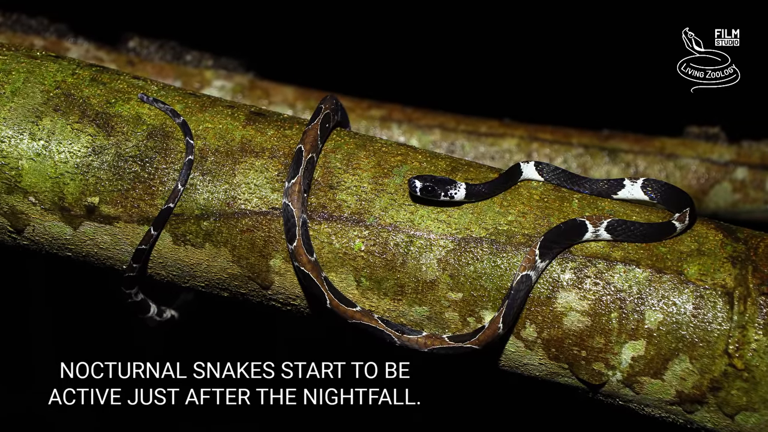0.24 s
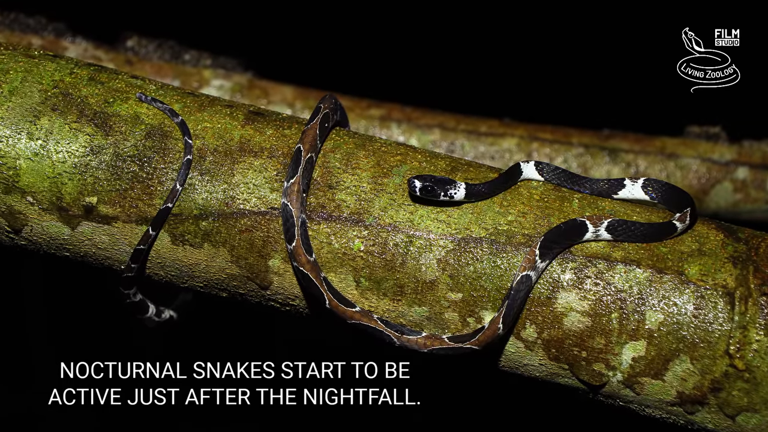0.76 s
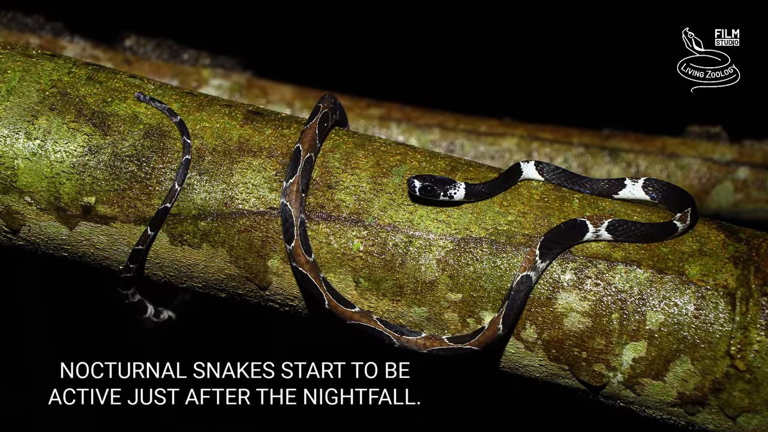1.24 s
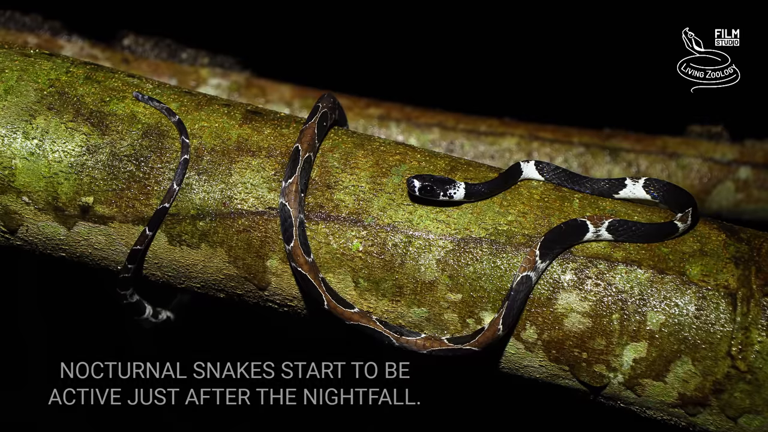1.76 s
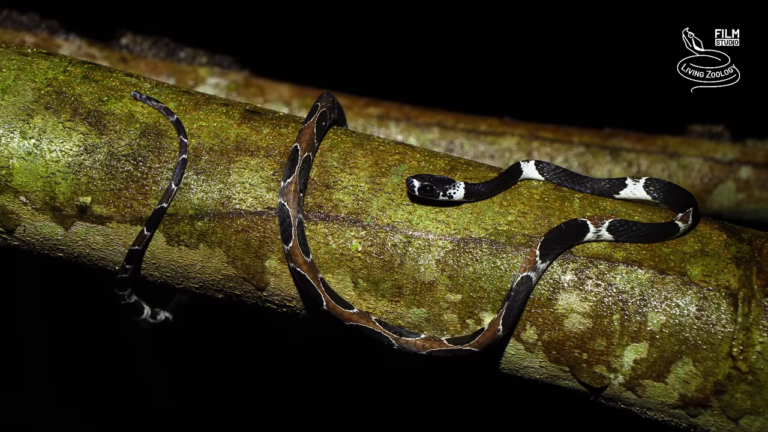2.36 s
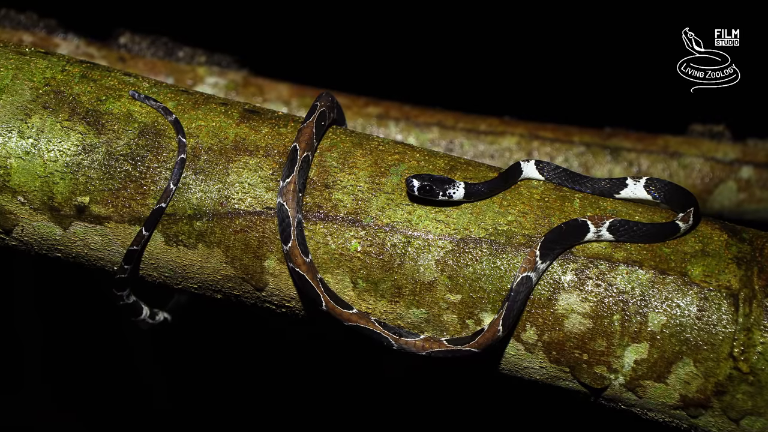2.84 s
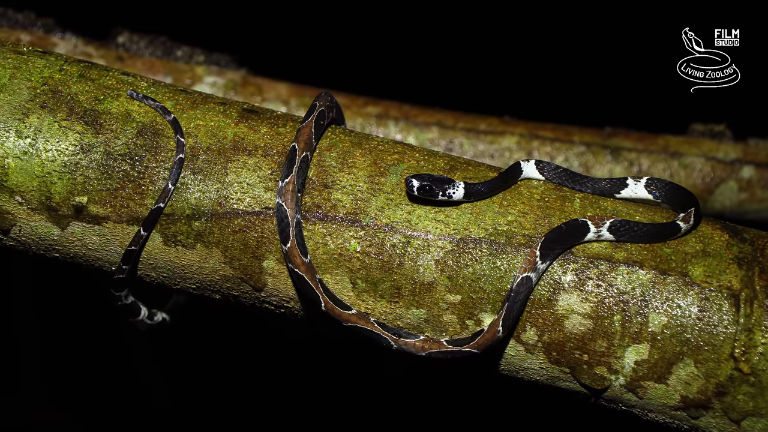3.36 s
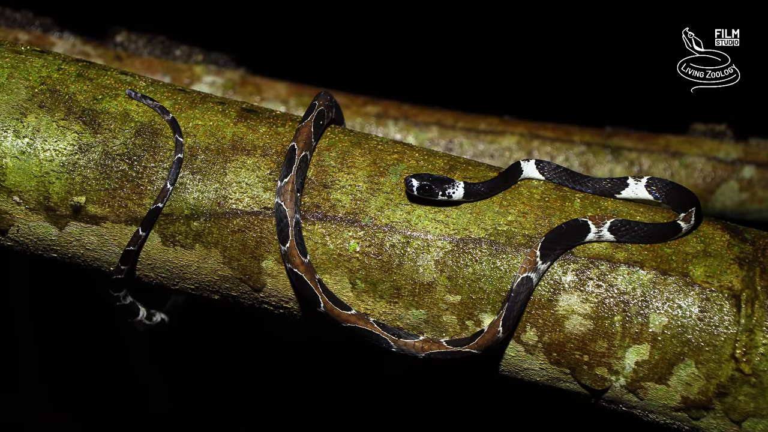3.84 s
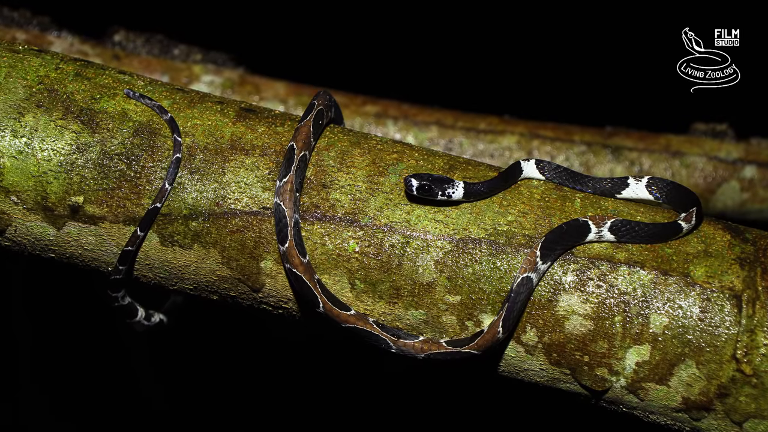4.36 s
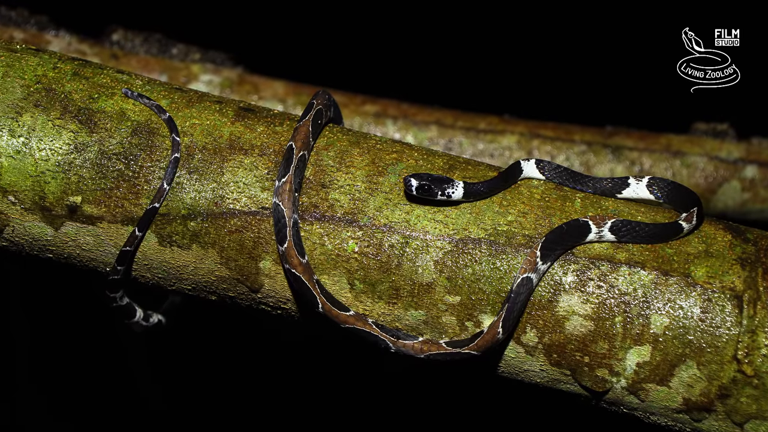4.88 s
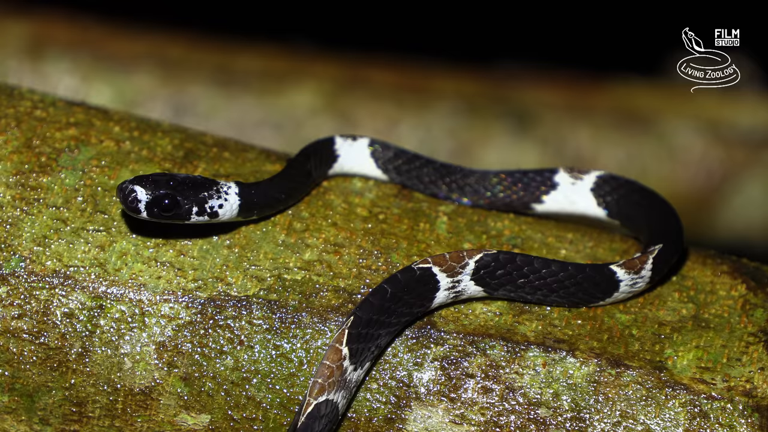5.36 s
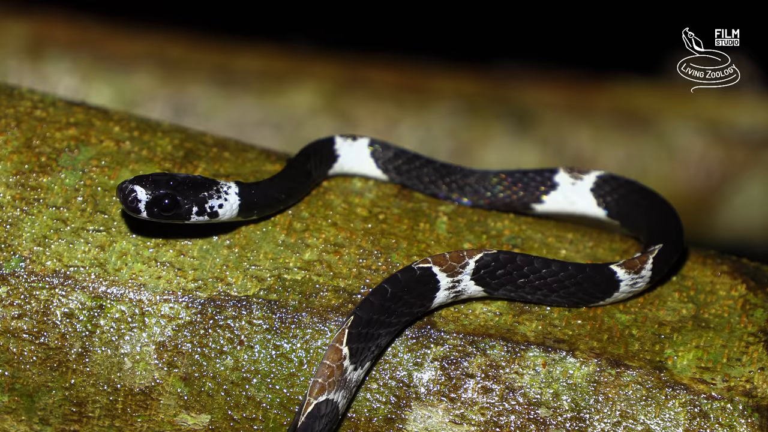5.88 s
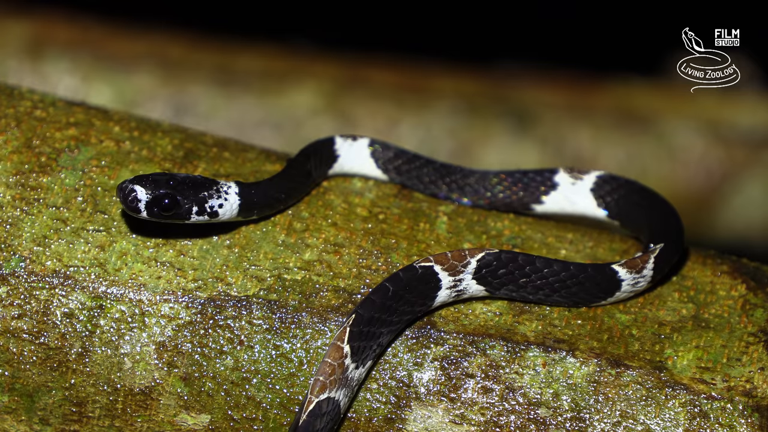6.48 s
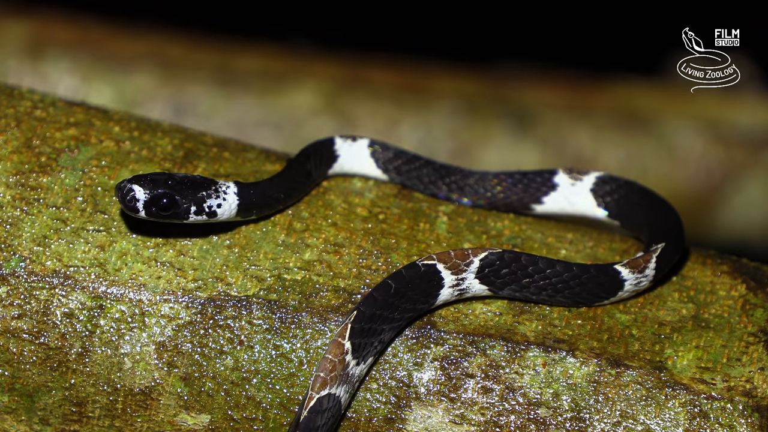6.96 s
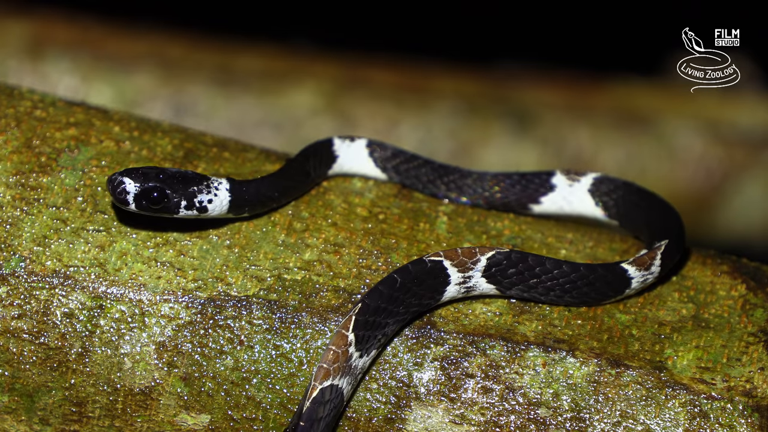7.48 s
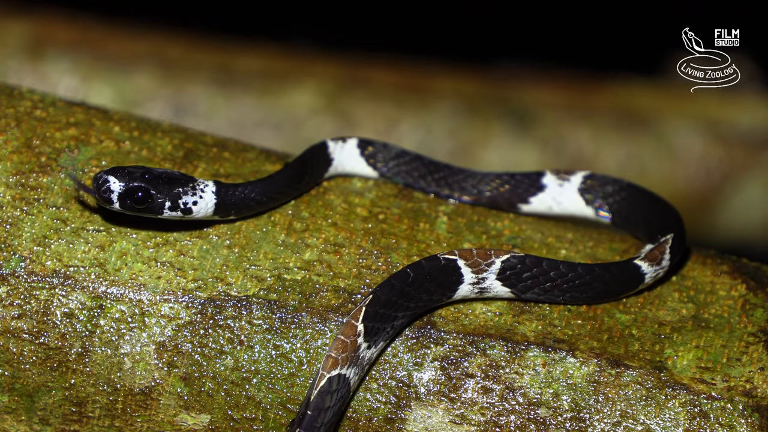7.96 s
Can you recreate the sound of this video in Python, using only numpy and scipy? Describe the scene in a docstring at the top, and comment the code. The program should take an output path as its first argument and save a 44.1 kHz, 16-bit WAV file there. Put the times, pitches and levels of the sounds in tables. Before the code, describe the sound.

A dense, high trill of distant crickets and a buzzing katydid runs throughout in a rainforest at night, over a faint low rumble of air. A near cricket chirps rapidly from the start, drops away at about 1 second, builds again from 2 seconds and stops at around 7.7 seconds. One small frog gives rising two-note whistles roughly every two thirds of a second until 5.5 seconds, while a lower cricket calls in short phrases over the same stretch. Another frog purrs briefly about every 1.4 seconds, and a third adds scattered high peeps, clearest just after 4 seconds and near 7. Occasional drops tap softly on leaves, the sharpest at about 6.3 seconds. A higher cricket begins even chirps at 6.7 seconds, and an insect adds a quick clacking rattle from 7.6 seconds until the end, just past 8. The trees give the calls a short echo.

```python
"""A rainforest at night

A near cricket scrapes its wings over a chorus of far crickets and a buzzing katydid (a bush cricket).
Small frogs whistle and trill, a lower cricket calls, and drops tap on leaves. Near the end a high
cricket and a rattling insect join in. Echoes from the trees give the calls a short tail."""
import sys
import numpy as np
from scipy import signal
from scipy.fft import rfft, irfft
from scipy.io import wavfile

SR = 44100
rng = np.random.default_rng(int(sys.argv[2]) if len(sys.argv) > 2 else 0)


def store_pcm(level_fs):
    """Save levels as 16-bit WAV."""
    pcm = np.round(np.clip(level_fs, -1, 1) * 32767).astype(np.int16)
    wavfile.write(sys.argv[1], SR, np.atleast_2d(pcm).T)


N = 362502
T = np.arange(N) / SR
FREQS = np.fft.rfftfreq(N, 1 / SR)

# tone of the night air: pitch_hz, level_db
AIR_TONE = [(20, -32), (40, -13), (52, -1), (62, -8), (82, -2), (105, -4.5), (170, -9.5), (320, -10.5),
            (500, -14.5), (1100, -20), (2600, -22), (4000, -18), (8000, -27.5), (16000, -53)]
# two faint low tones: pitch_hz, level_db
HUM_TONES = [(47, -80), (78, -68.5)]
# near cricket's wing strokes in one chirp: start_share, length_share, level_db, first_hz, last_hz
WING_STROKES = [(.92, .26, 0, 6865, 6815), (.33, .28, -.5, 6860, 6805), (.68, .2, -7, 6820, 6600)]
# it falls soft, tries once, builds up again and stops: time_s, level_db
NEAR_LEVEL = [(0, -40), (.8, -42), (.92, -70), (2, -58), (2.1, -50), (2.25, -54), (2.6, -47), (3.4, -43),
              (5.8, -40), (7.58, -41), (7.75, -73)]
# its pitch sags while it sings softly: time_s, pitch_factor
NEAR_SAG = [(.8, 1), (1, .975), (2.3, .974), (3.4, 1)]
# its speed: time_s, chirps_per_s
NEAR_TEMPO = [(0, 9.33), (1.5, 9.64), (3, 10.135), (5, 9.773), (8.2, 9.546)]
# groups of far crickets: pitch_hz, width_hz, level_db, pulses_per_s, pulse_depth
FAR_GROUPS = [(5970, 90, -59, 35, .5), (6270, 60, -55, 41.3, .6), (6410, 75, -49, 58.3, .6),
              (6600, 45, -50, 21.1, .5), (6695, 45, -53, 50, .5), (7090, 45, -62, 25, .5),
              (7235, 45, -58.5, 46, .5), (7358, 50, -55.5, 31, .5), (7710, 90, -54, 83, .6),
              (7870, 120, -57, 36, .5), (8245, 60, -52.3, 41, .6), (8388, 60, -52, 29, .6),
              (8570, 50, -66, 52, .5)]
# shape of the lower groups' rise and fall, used around its average: time_s, level_db
GROUP_SWELL = [(0.05, -44), (0.09, -44), (0.68, -42), (0.98, -45.5), (2.06, -45.5), (2.11, -41),
               (2.17, -46.5), (7.47, -46), (7.74, -49.5), (8.17, -54.5)]
# tone of countless farther crickets: pitch_hz, level_db
HISS_TONE = [(3500, -57), (4900, -23), (5600, -2.5), (6300, 2.5), (6600, 8.5), (7000, 3), (7550, -3.5),
             (8050, 1), (8400, 0), (8700, -7), (9200, -7), (10400, -26), (13000, -29), (15700, -33)]
# faint far trills: pitch_hz, width_hz, pulses_per_s, pulse_depth, list of (time_s, level_db)
FAINT_TRILLS = [(4570, 190, 29, 0.57, [(0, -65.5), (5.7, -63), (6.5, -78)]),
                (4140, 53, 6.7, 0.32, [(3, -74), (4.5, -64.5), (6.6, -67), (7.3, -81)]),
                (1514, 76, 12, 0.33, [(0, -76), (8.2, -78)])]
# tone of the katydid's buzz: pitch_hz, level_db
BUZZ_TONE = [(4400, -36.5), (5000, -17.5), (5400, -6), (6000, -4.5), (6600, 7), (7000, -0.5), (8300, 5.5),
             (8750, -15), (9200, -12.5), (9900, -16.5), (10700, -44)]
# short, high katydid rasps: middle_s, level_db, length_s
HIGH_RASPS = [(0.565, -72, .25), (1.03, -71, .3), (4.414, -75, 0.37), (4.98, -67, .32), (6.17, -67, 0.33),
              (7.73, -71, .28)]
# the trilling frog's calls: start_s, level_db, length_s
FROG_PURRS = [(-.07, -52.5, 0.19), (1.436, -52.5, 0.19), (2.749, -53, 0.17), (4.096, -53, 0.19),
              (5.459, -52, 0.18), (6.914, -52, 0.19)]
# the low cricket's phrases: start_s, level_db, double_note_count, first_gap_s
LOW_PHRASES = [(0.017, -49.5, 1, .09), (.341, -51, 4, .093), (0.992, -51, 3, 0.095),
               (1.517, -50.5, 3, 0.088), (2.107, -50.5, 4, 0.091), (2.707, -50.5, 3, 0.081),
               (3.338, -51, 4, .088), (4.278, -50.5, 3, 0.095), (5.104, -49.5, 2, .1)]
# a frog's two-note whistles: start_s, level_db, first_hz, second_note_delay_s
FROG_PAIRS = [(.070, -52, 2907, 0.13), (0.717, -51.5, 2900, .138), (1.318, -53.5, 2902, .152),
              (2.014, -51, 2900, 0.14), (2.678, -50.5, 2913, 0.14), (3.29, -50.5, 2893, .15),
              (3.95, -52, 2900, .135), (4.639, -51.5, 2877, 0.15), (5.282, -51.5, 2850, 0.15)]
# a higher frog's peeps: start_s, level_db, first_hz, length_s
FROG_PEEPS = [(.638, -60, 3830, 0.022), (2.33, -57, 4080, 0.031), (2.966, -52, 4240, 0.04),
              (4.179, -49, 4270, 0.042), (4.397, -47.5, 4310, 0.033), (6.58, -53.5, 4280, .052),
              (6.815, -51, 4360, .06)]
# drops and the leaves they ring: start_s, level_db, middle_hz, spread_octaves, decay_s
LEAF_DROPS = [(0.261, -57.5, 1370, 1.05, .008), (0.529, -57.5, 1616, 0.63, 0.013),
              (1.588, -53.5, 486, 0.497, 0.018), (3.851, -51, 1804, 1, 0.016),
              (4.849, -53, 2310, 0.71, 0.02), (6.084, -48.5, 1950, 1.3, 0.013),
              (6.319, -39, 3890, 1.1, 0.0023), (7.43, -59.5, 1690, 0.24, 0.018)]
# tone of the rattling insect: pitch_hz, level_db
RATTLE_TONE = [(1500, -17), (2200, -9), (2380, -6), (2650, -5.5), (3200, -20), (3800, -9), (4850, 5),
               (5200, -16), (6000, 3.5), (10000, -38), (15000, -36)]
# the ringing of its wing: pitch_hz, width_hz, level_db
WING_RINGS = [(2376, 86, -8), (4900, 80, -10)]


def amp(db):
    """Turns decibels into a number to multiply a sound by."""
    return 10 ** (np.asarray(db) / 20)


def evened(x):
    """Scales a sound to an average strength (rms) of 1."""
    return x / np.sqrt(np.mean(x ** 2) + 1e-20)


def curve(rows):
    """Joins (time, value) points with straight lines."""
    return np.interp(T, *np.transpose(rows))


def add(mix, start_s, sound):
    """Mixes a sound in, cutting off whatever does not fit."""
    start = round(start_s * SR)
    sound = sound[max(-start, 0):]
    part = mix[max(start, 0):][:len(sound)]
    part += sound[:len(part)]


def coloured(x, tone):
    """Turns each pitch up or down as a tone table says, at strength 1."""
    hz, db = np.transpose(tone)
    gain = amp(np.interp(np.log(FREQS + 1), np.log(hz), db))
    return evened(irfft(rfft(x) * gain, N))


def band(hz, width_hz):
    """Noise around one pitch; at 0 Hz, a random drift."""
    bell = np.exp(-((FREQS - hz) / width_hz) ** 2)
    return evened(irfft(rfft(rng.standard_normal(N)) * bell, N))


def note(first_hz, last_hz, length_s, peak=.42):
    """A gliding tone, loudest at the share of its length given by peak."""
    progress = np.linspace(0, 1, int(length_s * SR))
    swell = np.sin(np.pi * np.interp(progress, [0, peak, 1], [0, .5, 1]))
    cycles = np.cumsum(first_hz + (last_hz - first_hz) * progress) / SR + rng.random()
    return evened(swell * np.sin(2 * np.pi * cycles))


def forest(x, echo_db, tail_s):
    """Adds quick echoes off near trunks and a fading tail, keeping the same strength."""
    t = T[:SR]
    bounces = rng.standard_normal(SR) * (rng.random(SR) < 2000 / SR)
    fading = amp(-60 * t / tail_s) + .8 * np.exp(-t / .012)
    echoes = signal.fftconvolve(x, bounces * fading)[:N]
    return np.std(x) * evened(evened(x) + amp(echo_db) * evened(echoes))


def night_air():
    """The low rumble of the air, with a faint wavering hum."""
    rumble = amp(-60.5) * coloured(rng.standard_normal(N), AIR_TONE)
    hum = sum(amp(db) * evened(np.sin(2 * np.pi * hz * T + .76 * band(0, 7.1))) for hz, db in HUM_TONES)
    return rumble + hum


def near_cricket():
    """Each wing stroke is a tone that falls as one wing slows along the other's ridges."""
    chirps = .37 + np.cumsum(curve(NEAR_TEMPO)) / SR  # starts partway through a chirp
    bend = curve(NEAR_SAG) * (1 + .002 * band(0, 60))
    song = np.zeros(N)
    for start, length, db, first_hz, last_hz in WING_STROKES:
        progress = np.minimum((chirps - start) % 1 / length, 1)
        hz = bend * (first_hz + (last_hz - first_hz) * progress)
        swell = amp(db + band(0, 11)) * np.sin(np.pi * progress)
        song += swell * np.sin(2 * np.pi * np.cumsum(hz) / SR)
    return amp(curve(NEAR_LEVEL)) * evened(forest(song, echo_db=-2.5, tail_s=.45))


def far_trill(hz, width_hz, pulses_per_s, depth):
    """Wing tones blurred by distance, still throbbing with each stroke."""
    strokes = np.cumsum(pulses_per_s * (1 + .0317 * band(0, 2.97))) / SR + rng.random()
    return evened(band(hz, width_hz) * (1 + depth * np.sin(2 * np.pi * strokes)))


def far_crickets():
    """Groups swell and fade over the hiss of countless others and a few faint, lower trills."""
    low_db = 1.1 * (curve(GROUP_SWELL) - curve(GROUP_SWELL).mean())
    out = amp(-46) * coloured(rng.standard_normal(N), HISS_TONE)
    for hz, width, db, rate, depth in FAR_GROUPS:
        drift = band(0, 2.4)
        swell_db = low_db + drift if hz < 7000 else -.5 * drift
        out += amp(db + swell_db) * far_trill(hz, width, rate, depth)
    for hz, width, rate, depth, levels in FAINT_TRILLS:
        out += amp(curve(levels)) * far_trill(hz, width, rate, depth)
    return out


def katydids(snaps_per_s=77):
    """One buzzes with a steady run of wing snaps; others give short, very high rasps."""
    snap_count = np.floor(np.cumsum(snaps_per_s * (1 + .0015 * band(0, 2))) / SR)
    snaps = np.diff(snap_count, prepend=0)
    buzz = amp(-47) * coloured(forest(snaps, echo_db=5.5, tail_s=.56), BUZZ_TONE)
    swells = sum(amp(db) * np.exp(-8 * ((T - s) / length) ** 2) for s, db, length in HIGH_RASPS)
    rasps = swells * far_trill(12500, 1700, pulses_per_s=60, depth=.2)
    far_rasps = amp(-84 + 4 * band(0, 6)) * band(12200, 700)
    return buzz + rasps + far_rasps


def trilling_frog(pulse_every_s=.0185):
    """A purr of short, slightly uneven rising pulses that swells in the middle."""
    out = np.zeros(N)
    for s, db, length in FROG_PURRS:
        for at in np.arange(0, length, pulse_every_s):
            swell_db = 4 * (np.sin(np.pi * at / length) - .5) + 1.7 * rng.standard_normal()
            pulse = note(first_hz=3940, last_hz=4420, length_s=.012)
            add(out, s + at + .0012 * rng.standard_normal(), amp(db + swell_db) * pulse)
    return forest(out, echo_db=1.5, tail_s=.5)


def low_cricket(slowing_s=.008, twin_delay_s=.038, twin_db=-.5):
    """Slowing phrases of falling double notes from some way off."""
    out = np.zeros(N)
    for s, db, count, gap in LOW_PHRASES:
        for k in range(round(count)):
            for delay, accent_db in ((0, 0), (twin_delay_s, twin_db)):
                stroke = note(first_hz=4780, last_hz=4473, length_s=.03, peak=.32)
                add(out, s + delay, amp(db + accent_db + .5 * rng.standard_normal()) * stroke)
            s += gap + k * slowing_s
    return forest(out, echo_db=2.5, tail_s=.5)


def whistling_frogs():
    """Hoarse, rising whistles: short-long pairs from one frog, single peeps from a higher one."""
    pairs, peeps = np.zeros((2, N))
    for s, db, hz, delay in FROG_PAIRS:
        add(pairs, s, amp(db - 3.5) * note(hz, hz * 1.129, length_s=.0442, peak=.63))
        add(pairs, s + delay, amp(db) * note(hz, hz * 1.1553, length_s=.0638, peak=.68))
    for s, db, hz, length in FROG_PEEPS:
        add(peeps, s, amp(db) * note(hz, hz + 217, length, peak=.47))
    hoarse = 1 + .25 * band(0, 130)  # a fast flutter in loudness
    return forest(pairs * hoarse, echo_db=7, tail_s=.7) + forest(peeps * hoarse, echo_db=7, tail_s=.55)


def leaf_drops(tone_count=18):
    """Each drop splats on another leaf, which rings briefly at its own scattered pitches."""
    out, t = np.zeros(N), T[:SR // 4]
    for s, db, middle_hz, octaves, decay in LEAF_DROPS:
        steps = np.linspace(-1.6, 1.6, tone_count) + .082 * rng.standard_normal(tone_count)
        hz = np.minimum(middle_hz * 2 ** (octaves * steps), SR / 2)
        tones = np.sin(2 * np.pi * hz[:, None] * t)
        ring = evened(rng.choice([-1., 1.], tone_count) @ tones)  # adds them, some upside down
        splat = band(middle_hz, 2 * middle_hz * octaves)[:len(t)]
        add(out, s, amp(db) * evened(ring + splat) * np.exp(-t / decay))
    return forest(out, echo_db=-15, tail_s=.4)


def high_cricket(start_s=6.745, chirp_every_s=.201, stroke_every_s=.014):
    """Evenly spaced chirps, each a quick run of six wing strokes that grows louder."""
    out = np.zeros(N)
    for s in np.arange(start_s, T[-1], chirp_every_s):
        for k, db in enumerate(np.linspace(-47, -43, 6)):
            stroke = note(first_hz=7850, last_hz=7630, length_s=.016)
            add(out, s + k * stroke_every_s, amp(db) * stroke)
    return forest(out, echo_db=-12, tail_s=.35)


def rattling_insect(start_s=7.637, clack_every_s=.0955):
    """Sharp, even clacks with a softer rasp between them, through one ringing wing."""
    force = amp(-59.5) * (T > start_s) * (1 + .24 * np.sin(2 * np.pi * 85 * T))  # the rasp
    clack = amp(-51) * np.exp(-T[:SR] / .015)
    for s in np.arange(start_s, T[-1], clack_every_s):
        add(force, s, clack)
    ring = sum(amp(db) * band(hz, width) for hz, width, db in WING_RINGS)
    return force * (coloured(rng.standard_normal(N), RATTLE_TONE) + ring)


def scene():
    """Adds the air, insects, frogs and drops into one channel."""
    steady = night_air() + near_cricket() + far_crickets() + katydids()
    calls = trilling_frog() + low_cricket() + whistling_frogs()
    return (steady + calls + leaf_drops() + high_cricket() + rattling_insect())[None]


def record(dry):
    """Cuts away the very highest treble."""
    top_hz = 15650
    treble_cut = signal.firwin(511, top_hz, window=("kaiser", 9), fs=SR)
    return signal.oaconvolve(dry, treble_cut[None], "same")


dry = scene()
out = record(dry)
store_pcm(out)
```